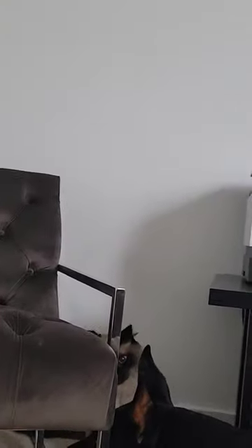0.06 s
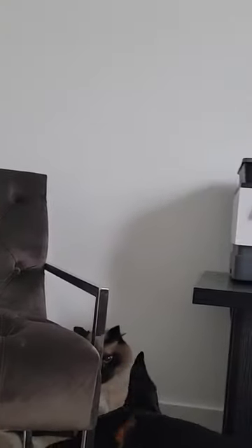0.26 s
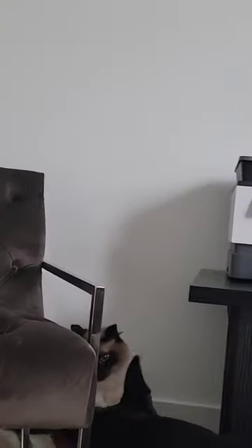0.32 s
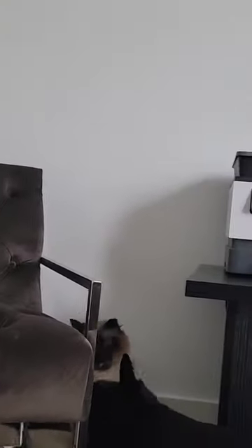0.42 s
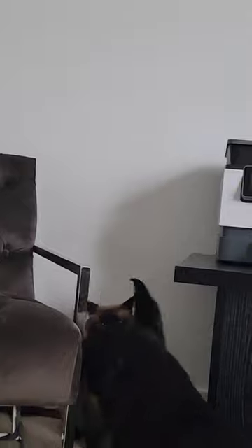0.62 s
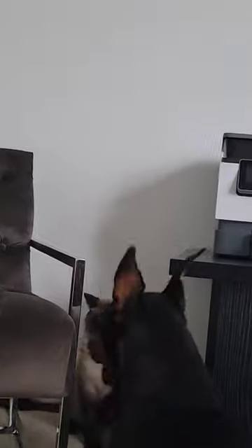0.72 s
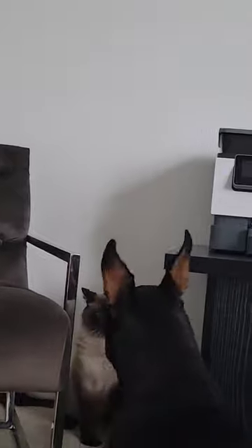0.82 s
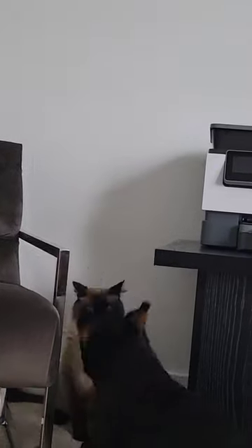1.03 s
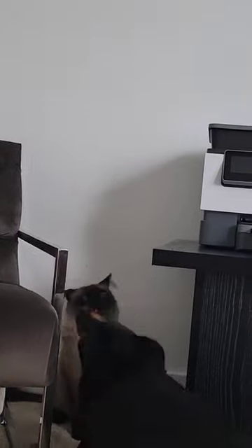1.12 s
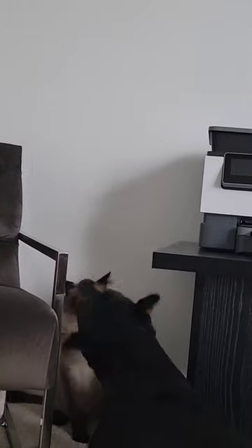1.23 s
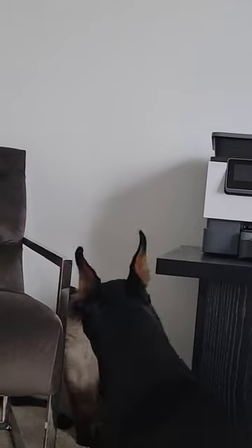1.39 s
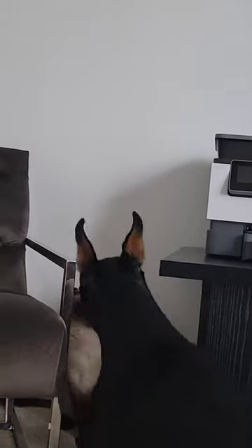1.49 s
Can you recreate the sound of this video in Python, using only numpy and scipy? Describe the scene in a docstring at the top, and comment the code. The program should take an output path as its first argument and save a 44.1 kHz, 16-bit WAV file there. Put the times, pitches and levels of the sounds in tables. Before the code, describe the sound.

In a small room with bare walls and a low hum, a large dog lets out a single gruff bark. Two quieter cat hisses follow, then faint puffs from the dog's nose and one dull paw thump.

```python
"""A big dog gives one short, gruff bark: uneven vocal pulses and breath ring its chest and mouth.
A cornered cat answers with a long hiss and a shorter one, air rushing through its open mouth.
The dog shifts its weight, snorts through its nose and lands a paw on the floor with a dull thump.
A low hum fills the small room, and the bare walls answer every sound."""
import sys
import numpy as np
from scipy import signal
from scipy.fft import rfft, irfft, next_fast_len
from scipy.io import wavfile

SR = 44100
rng = np.random.default_rng(int(sys.argv[2]) if len(sys.argv) > 2 else 0)


def master(y):
    """Save y as 16-bit WAV."""
    cut = np.clip(np.atleast_2d(y).T, -1, 1)
    pcm = np.round(cut * 32767)  # scale
    wavfile.write(sys.argv[1], SR, pcm.astype(np.int16))


N = 68355

# Each row: time in seconds, pitch in Hz.
BARK_PITCH_HZ = [(.218, 152), (.236, 165), (.25, 203), (.262, 197), (.275, 194), (.3, 193), (.318, 199),
                 (.338, 206)]
# Each row: time in seconds, level in dB, mouth opening as gain in dB, roughness from 0 to 1.
BARK_CONTOUR = [(.18, -130, -13.5, 0.66), (.203, -60, 1, 0.33), (.218, -51, -1, 0.3),
                (.222, -34, 3.5, 0.42), (.231, -33.5, -9.5, .25), (.248, -24.5, -1, 0.2),
                (.27, -25, 1.5, 0.13), (.3, -23.5, -10, 0.07), (.332, -27.5, -3, .35),
                (.35, -41, -4.5, 0.34), (.385, -130, -16, 0.76)]
# Chest, lower and upper mouth resonances, rushing air. Each row: frequency in Hz, gain in dB.
CHEST_SPECTRUM = [(60, -46.5), (130, -11.5), (195, -4.5), (300, -10), (400, -7.5), (560, -32),
                  (1500, -87.5)]
MOUTH_LOW_SPECTRUM = [(150, -35), (390, 0.5), (500, -4.5), (650, 6.5), (800, 2.5), (980, 1.5), (1130, -10),
                      (1330, -30), (3000, -84)]
MOUTH_HIGH_SPECTRUM = [(600, -39), (1330, -18.5), (1580, -5), (1790, 0.5), (2000, -11.5), (2270, -13.5),
                       (2550, -34), (2850, -24.5), (3700, -43.5), (5000, -29.5), (7500, -50), (15000, -66)]
BARK_AIR_SPECTRUM = [(1500, -35), (2900, 4), (3700, -3), (4900, 6), (6500, -3.5), (8000, -18), (15000, -23)]
PITCH_JITTER, SHIMMER_DB = 0.009, 1.2
BITE_DB_PER_DB, RUSH_DB_PER_DB = 0.14, 0.72

def bark():
    """Uneven vocal pulses and gated breath ring the chest and the opening mouth; louder is brighter."""
    pitch_hz, = curves(BARK_PITCH_HZ)
    level_db, opening_db, roughness = curves(BARK_CONTOUR)
    cycles = np.cumsum(pitch_hz * (1 + PITCH_JITTER * ring(0, half_width_hz=80))) / SR
    closures = np.flatnonzero(np.diff(np.floor(cycles)))
    pulses = np.zeros(N)
    pulses[closures] = -amp(SHIMMER_DB * rng.standard_normal(N)[:len(closures)])
    breath = unit(rng.standard_normal(N) * np.exp(-2 * (cycles % 1)))
    source = np.sqrt(1 - roughness) * unit(pulses) + np.sqrt(roughness) * breath
    mouth_db = level_db + opening_db
    effort_db = mouth_db - mouth_db.max()
    chest = amp(level_db - 3) * unit(resonate(source, CHEST_SPECTRUM))
    low = amp(mouth_db + 1) * unit(resonate(source, MOUTH_LOW_SPECTRUM))
    high = amp(mouth_db + BITE_DB_PER_DB * effort_db - 12.5) * unit(resonate(source, MOUTH_HIGH_SPECTRUM))
    rush = amp(RUSH_DB_PER_DB * effort_db - 55) * noise(BARK_AIR_SPECTRUM)
    return (room(low + high, wet_db=-3, pan_db=-1)
            + room(chest, wet_db=-7, pan_db=-0.5)
            + room(rush, wet_db=13, pan_db=-1.5))


# Each row: time in seconds, level in dB, mouth resonance in Hz, its relative level in dB.
HISS_CONTOUR = [(.285, -110, 947.8, 1), (.305, -52, 949.4, 12), (.335, -42.5, 900, 1.5), (.41, -42, 900, 0),
                (.44, -42.5, 779.7, -1), (.505, -41.5, 888.6, 2), (.535, -47.5, 979, -2.5),
                (.6, -69, 960, -10), (.66, -60, 880.8, -3.5), (.72, -53.5, 847, 0.5),
                (.747, -48.5, 862, 5.5), (.757, -50.5, 848, 4), (.777, -56.5, 820, 14), (.79, -71, 753, 12),
                (.86, -110, 810, 4)]
# Each row: frequency in Hz, gain in dB.
HISS_SPECTRUM = [(100, -13), (400, 0), (600, -4.5), (1100, 1.5), (1700, -8), (2200, -6.5), (2700, -9.5),
                 (5500, -16), (7000, -21), (8300, -22), (11000, -25.5), (15000, -24)]

def hisses():
    """Air rushes through the cat's mouth, whose resonance wanders; the last spit whistles in its teeth."""
    level_db, mouth_hz, ring_db = curves(HISS_CONTOUR)
    rush = amp(level_db) * (noise(HISS_SPECTRUM) + amp(ring_db) * ring(mouth_hz, half_width_hz=81))
    whistle = amp(-63) * swell(0.778, rise_s=0.018, fall_s=0.0067) * ring(3370, half_width_hz=90)
    return room(rush + whistle, wet_db=7, pan_db=-1.4, lag_ms=-0.13)


# Each row: peak, rise and fall in seconds, level in dB, nostril resonance in Hz, its relative level in dB.
SNORTS = [(0.211, .01, 0.027, -58, 3000, -19), (1.088, 0.056, 0.032, -67.5, 1050, 4.5),
          (1.169, 0.031, 0.023, -52, 1044, 4.5), (1.197, 0.041, 0.016, -58.5, 4500, -5.5),
          (1.22, 0.027, 0.013, -48.5, 2050, -9), (1.309, 0.005, 0.0067, -56.5, 2150, -5),
          (1.375, 0.054, 0.019, -74.5, 3684, 2), (1.409, 0.029, 0.053, -69, 1000, 7)]
# Nose air and coat rustle. Each row: frequency in Hz, gain in dB.
SNORT_SPECTRUM = [(150, -8), (600, 8), (1000, 3), (1800, 8), (3000, 0), (5000, -13.5), (8000, -20.5),
                  (15000, -34)]
COAT_SPECTRUM = [(1500, -25), (4000, 1.5), (8000, -2), (15000, -16)]

def snorts():
    """Short puffs of air ring the dog's nostrils; its coat rustles faintly."""
    puffs = np.zeros(N)
    for peak_s, rise_s, fall_s, level_db, nostril_hz, ring_db in SNORTS:
        air = noise(SNORT_SPECTRUM) + amp(ring_db) * ring(nostril_hz, half_width_hz=0.12 * nostril_hz)
        puffs += amp(level_db) * swell(peak_s, rise_s, fall_s) * air
    rustle = amp(-73.5) * swell(1.395, rise_s=0.065, fall_s=0.015) * noise(COAT_SPECTRUM)
    return room(puffs + rustle, wet_db=2.5, pan_db=-1.9, lag_ms=-0.14)


# Each row: peak, rise and fall in seconds, level in dB.
WEIGHT_SHIFTS = [(0.413, 0.021, 0.013, -40), (.488, 0.036, 0.13, -45), (0.68, .012, 0.036, -45),
                 (0.726, .02, 0.02, -48.5), (1.279, 0.076, 0.079, -50.5), (1.41, 0.079, .04, -51.5)]
# Floorboards and paw scuff. Each row: frequency in Hz, gain in dB.
FLOOR_SPECTRUM = [(25, -44), (60, -0.5), (95, -0.5), (140, -9), (250, -16), (450, -22.5), (1000, -20.5),
                  (3000, -54)]
SCUFF_SPECTRUM = [(100, 9), (400, 10), (1000, 10), (2000, -9), (6000, -17), (15000, -55)]
THUMP_S, THUMP_HZ = 1.2575, 109

def paws():
    """The floor rumbles under the dog's shifting weight; one paw lands with a thump and a scuff."""
    rumble = sum(amp(level_db) * swell(peak_s, rise_s, fall_s) * noise(FLOOR_SPECTRUM)
                 for peak_s, rise_s, fall_s, level_db in WEIGHT_SHIFTS)
    floor_tone = -np.cos(2 * np.pi * THUMP_HZ * (clock() - THUMP_S))
    thump = amp(-25.5) * swell(THUMP_S, rise_s=0.006, fall_s=0.0062) * floor_tone
    scuff = amp(-47) * swell(THUMP_S, rise_s=0.028, fall_s=0.03) * noise(SCUFF_SPECTRUM)
    return room(rumble + thump + scuff, wet_db=-6.5, pan_db=-1.5, lag_ms=-0.2)


# Each row: frequency in Hz, level in dB.
HUM_TONES = [(68, -62.5), (234, -61.5), (545, -75.5)]
# Each row: frequency in Hz, gain in dB.
AMBIENCE_SPECTRUM = [(20, -22), (65, 13), (100, 1), (135, 4), (180, -8), (240, 0.5), (330, -10.5),
                     (700, -12), (1500, -18), (3000, -32.5), (6000, -40), (15000, -51)]
HUM_WAVER = 0.49

def ambience():
    """Quiet room noise with a wavering hum, slightly to the right."""
    hum = np.zeros(N)
    for hz, level_db in HUM_TONES:
        tone = np.sin(2 * np.pi * (hz * clock() + rng.random()))
        hum += amp(level_db) * (tone + HUM_WAVER * ring(hz, half_width_hz=7.3))
    room_noise = amp(-57.5) * diffuse(np.array([noise(AMBIENCE_SPECTRUM), noise(AMBIENCE_SPECTRUM)]))
    return (room_noise + hum) * amp([[-1.1], [1.1]])


# Each row: frequency in Hz, reverberation T60 in seconds.
WALL_DECAY = [(100, 0.12), (300, 0.37), (900, 0.29), (3000, 0.26), (8000, 0.28), (15000, 0.067)]
BUILD_UP_S, STANDING_DB = 0.0013, 9.5

def room(x, wet_db, pan_db, lag_ms=0):
    """Direct sound at two microphones, plus wall reflections and standing waves; positive pan is left."""
    hz, t, spectra = signal.stft(rng.standard_normal((2, SR // 2)), SR, nperseg=256)
    decay = amp(-60 * t / along(WALL_DECAY, hz)[:, None])
    tail = diffuse(signal.istft(spectra * decay, SR, nperseg=256)[1])
    tail *= 1 - np.exp(-np.arange(tail.shape[1]) / SR / BUILD_UP_S)
    wet = signal.fftconvolve(x[None], tail / np.linalg.norm(tail[0]), axes=1)[:, :N]
    sides = np.array([[1], [-1]])
    direct = filtered(x, lambda f: np.exp(-1j * np.pi * f * sides * lag_ms / 1000))
    modes = amp(STANDING_DB) * filtered(x, standing_waves)
    return (direct + modes + amp(wet_db) * wet) * amp(sides * pan_db / 2) / np.hypot(1, amp(wet_db))


# Each row: frequency in Hz, relative gain in dB, T60 in seconds.
STANDING_MODES = [(217.3, -8, .6), (267.4, -5, 0.91), (302, -7, 0.46), (408, -8.5, .4), (474, -4.5, 0.42)]

def standing_waves(hz):
    """Frequency response of the room's modes, each a damped resonance."""
    return sum(amp(gain_db) / (1 + 2j * np.pi * (hz - mode_hz) * t60_s / np.log(1000))
               for mode_hz, gain_db, t60_s in STANDING_MODES)


# Each row: frequency in Hz, left-right correlation of the room sound.
STEREO_CORRELATION = [(100, 0.87), (200, 0.52), (300, 0.12), (1000, -0.24), (4000, 0.17)]

def diffuse(pair):
    """Two unrelated signals become a stereo field that is alike in the bass."""
    def mid_side_gains(hz):
        angle = np.arccos(along(STEREO_CORRELATION, hz)) / 2
        return np.array([np.cos(angle), np.sin(angle)])
    mid, side = filtered(pair, mid_side_gains)
    return np.array([mid + side, mid - side])


def amp(db):
    """Decibels to gain."""
    return 10 ** (np.asarray(db) / 20)


def unit(x):
    """Scale to rms 1."""
    return x / np.sqrt(np.mean(x ** 2) + 1e-20)


def along(points, hz):
    """Interpolate (Hz, value) points on a log frequency axis."""
    point_hz, values = np.transpose(points)
    return np.interp(np.log(hz + 1), np.log(point_hz + 1), values)


def clock():
    """Sample times in seconds."""
    return np.arange(N) / SR


def curves(rows):
    """One value per sample for each column after the time."""
    times_s, *columns = np.transpose(rows)
    return [np.interp(clock(), times_s, column) for column in columns]


def swell(peak_s, rise_s, fall_s):
    """Gaussian rise, exponential fall."""
    t = clock() - peak_s
    return np.exp(-np.where(t < 0, (t / rise_s) ** 2, t / fall_s))


def filtered(x, response):
    """Apply a response given as a function of Hz."""
    size = next_fast_len(N + SR // 2)
    return irfft(rfft(x, size) * response(np.fft.rfftfreq(size, 1 / SR)), size)[..., :x.shape[-1]]


def resonate(x, spectrum):
    """Minimum-phase filter through (Hz, dB) points."""
    size = 4096
    cepstrum = irfft(np.log(amp(along(spectrum, np.fft.rfftfreq(size, 1 / SR)))))
    cepstrum[1:size // 2] *= 2
    cepstrum[size // 2 + 1:] = 0
    return signal.fftconvolve(x, irfft(np.exp(rfft(cepstrum))))[:N]


def noise(spectrum):
    """Noise of rms 1, coloured by (Hz, dB) points."""
    return unit(filtered(rng.standard_normal(N), lambda hz: amp(along(spectrum, hz))))


def ring(hz, half_width_hz):
    """Noise of rms 1 in one resonance whose centre may move."""
    a, b = filtered(rng.standard_normal((2, N)), lambda f: 1 / (1 + (f / half_width_hz) ** 2))
    phase = 2 * np.pi * np.cumsum(hz * np.ones(N)) / SR
    return unit(a * np.cos(phase) + b * np.sin(phase))


def scene():
    """Dog, cat and room together."""
    return bark() + hisses() + snorts() + paws() + ambience()


BAND_LIMIT_HZ = 15600

def record(dry):
    """Brick-wall low-pass."""
    return filtered(dry, lambda hz: hz < BAND_LIMIT_HZ)


dry = scene()
out = record(dry)
master(out)
```